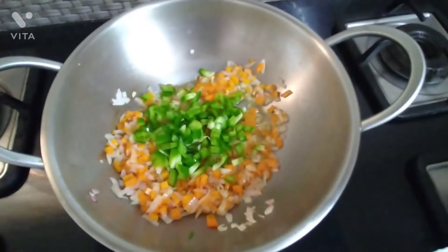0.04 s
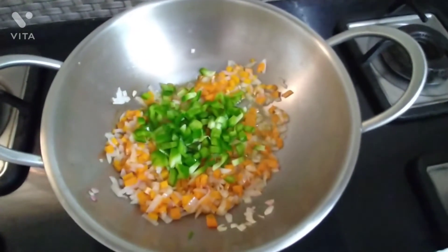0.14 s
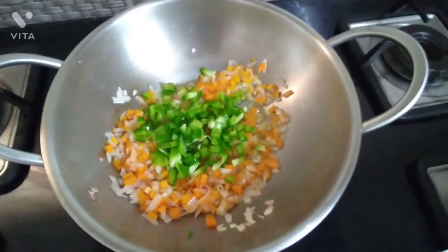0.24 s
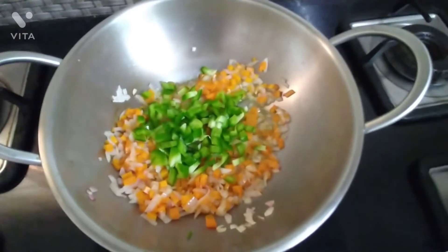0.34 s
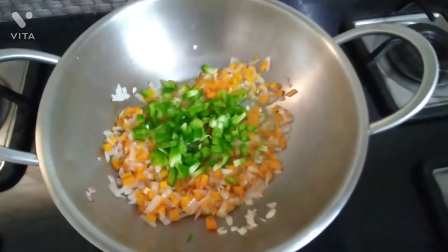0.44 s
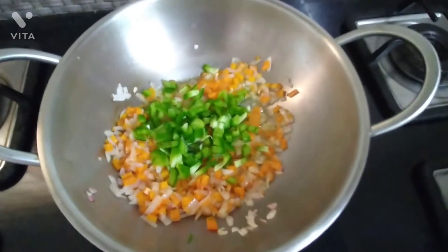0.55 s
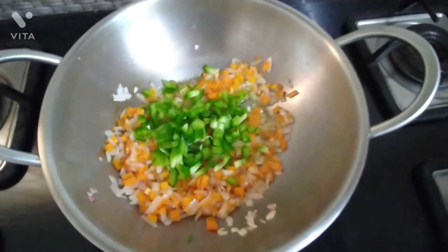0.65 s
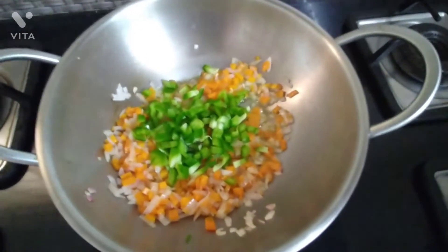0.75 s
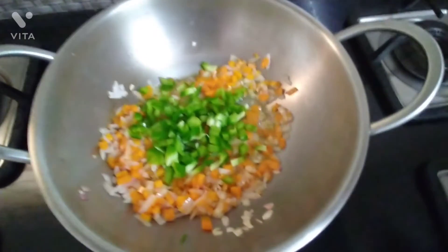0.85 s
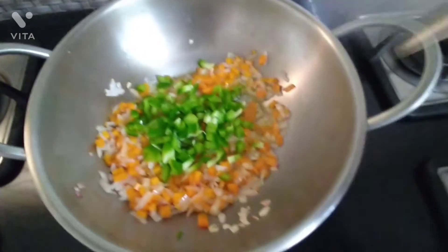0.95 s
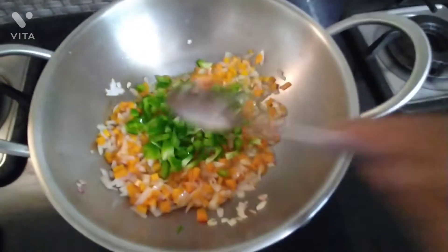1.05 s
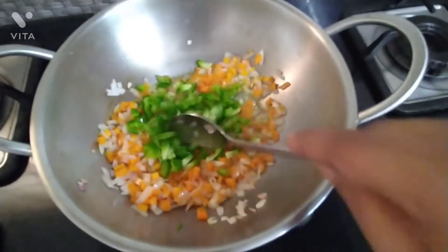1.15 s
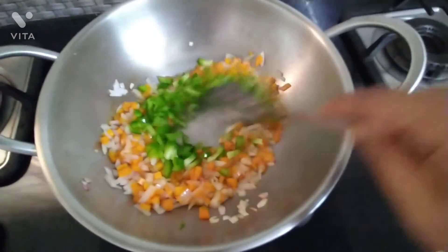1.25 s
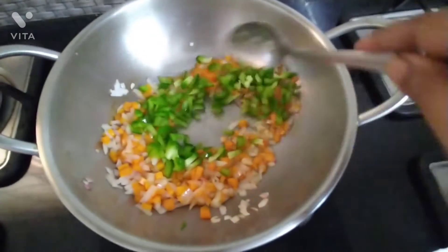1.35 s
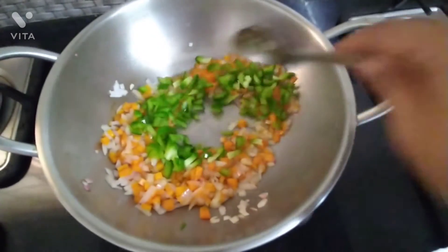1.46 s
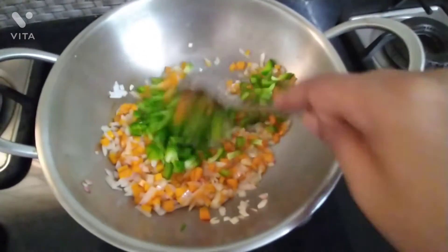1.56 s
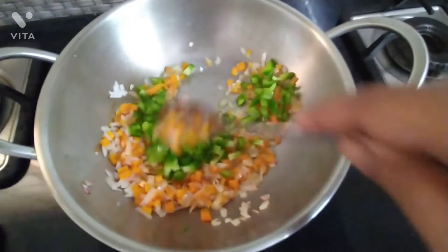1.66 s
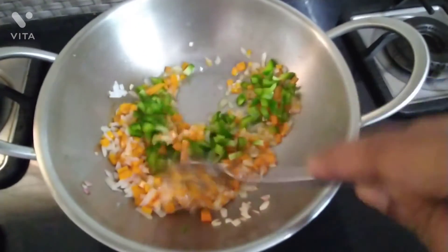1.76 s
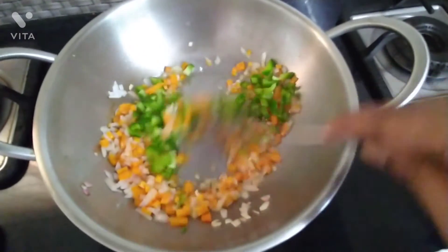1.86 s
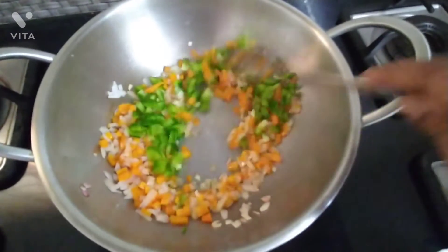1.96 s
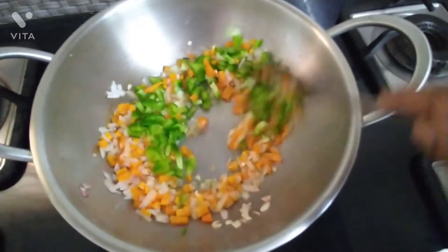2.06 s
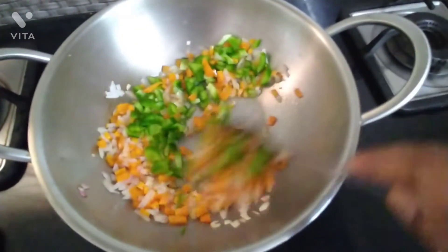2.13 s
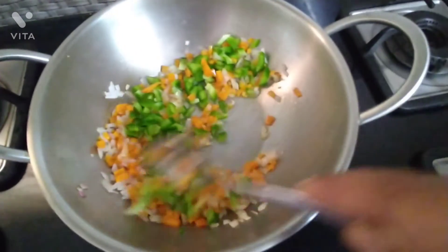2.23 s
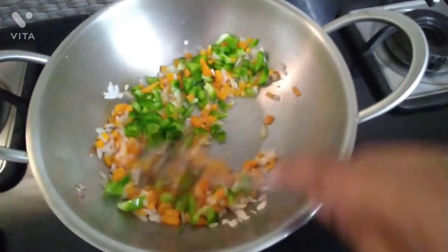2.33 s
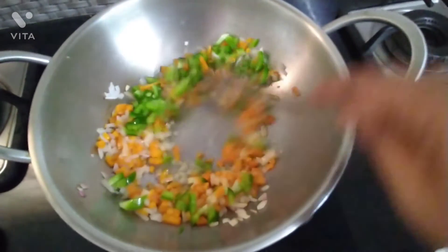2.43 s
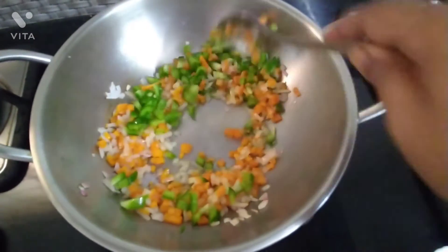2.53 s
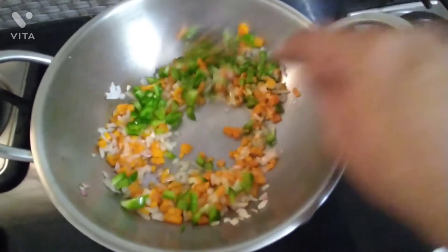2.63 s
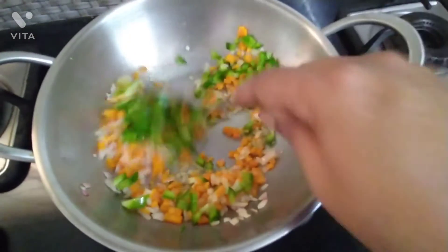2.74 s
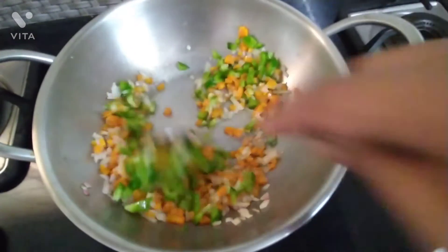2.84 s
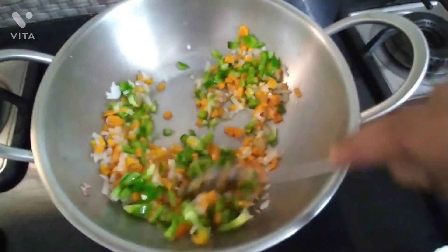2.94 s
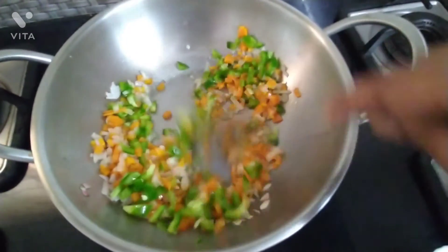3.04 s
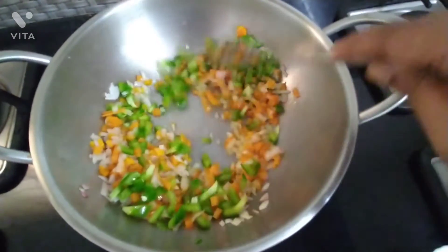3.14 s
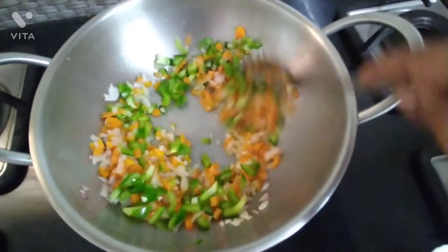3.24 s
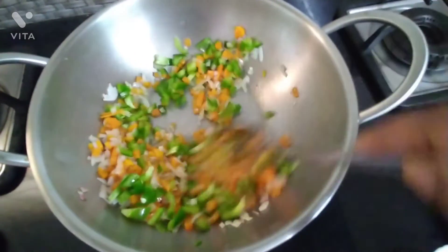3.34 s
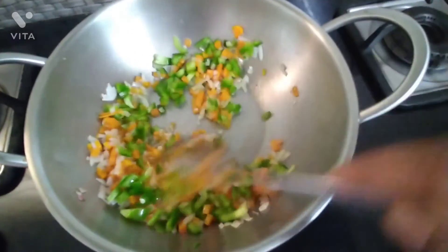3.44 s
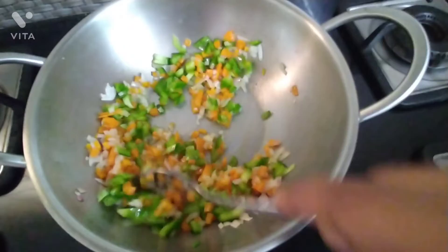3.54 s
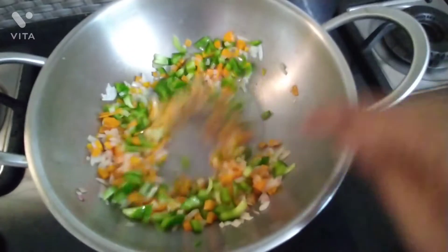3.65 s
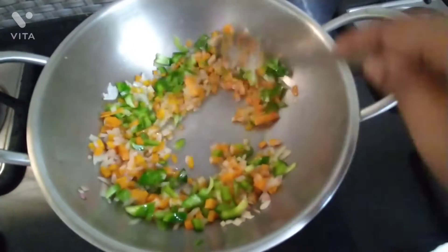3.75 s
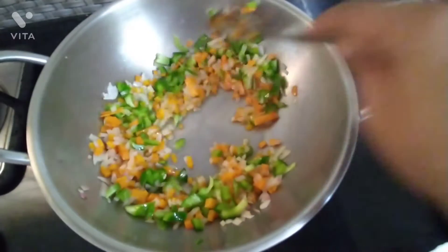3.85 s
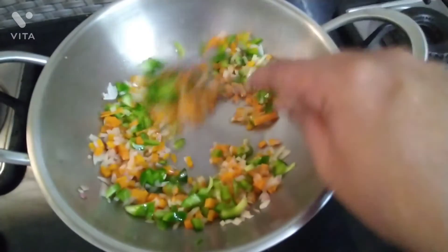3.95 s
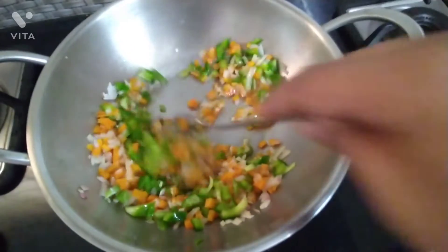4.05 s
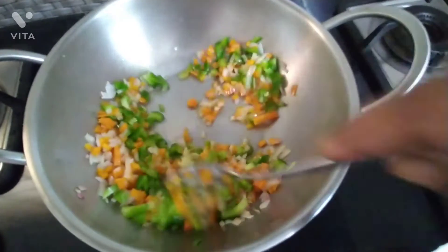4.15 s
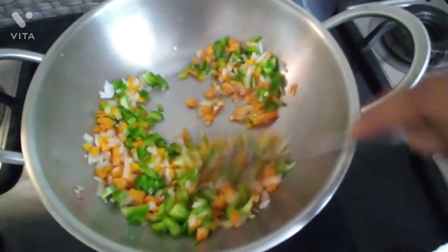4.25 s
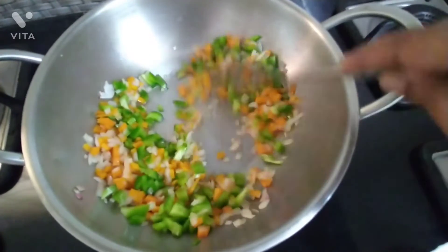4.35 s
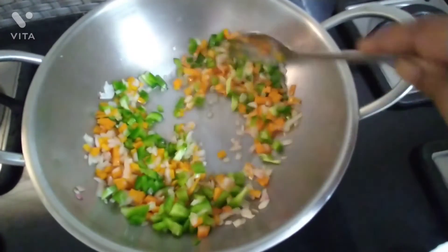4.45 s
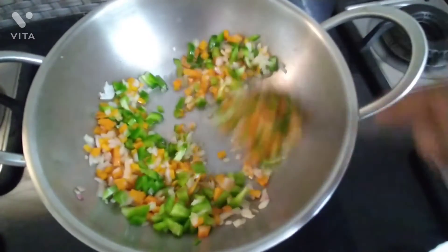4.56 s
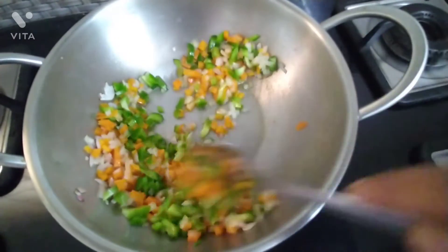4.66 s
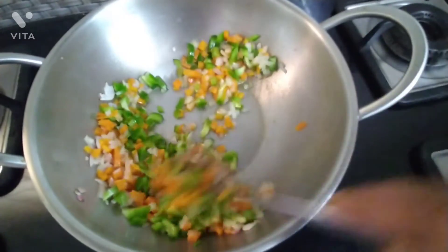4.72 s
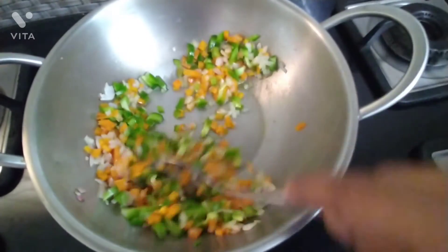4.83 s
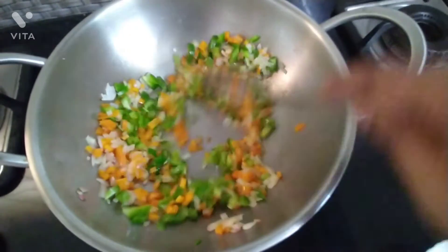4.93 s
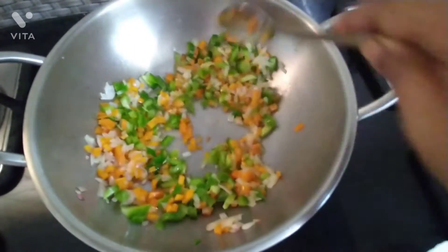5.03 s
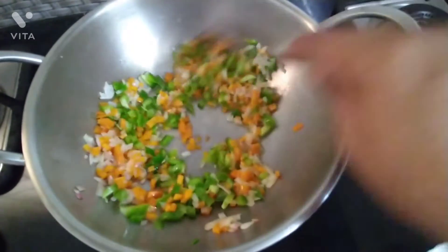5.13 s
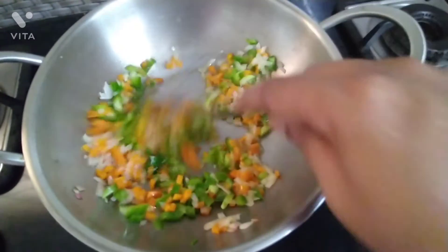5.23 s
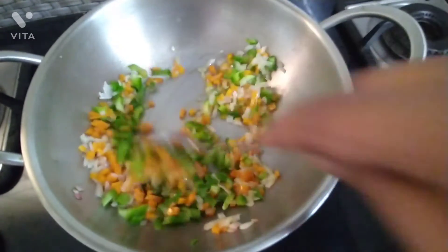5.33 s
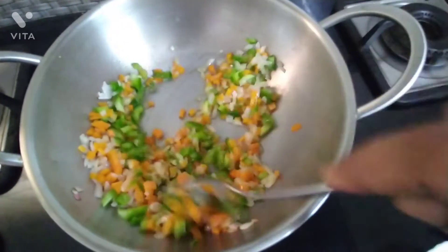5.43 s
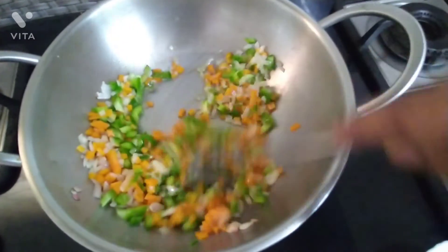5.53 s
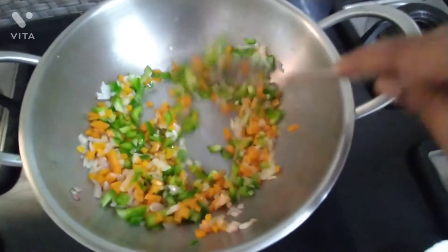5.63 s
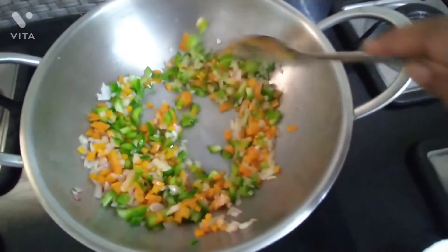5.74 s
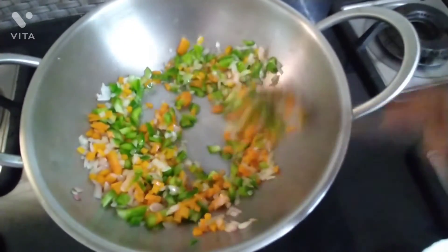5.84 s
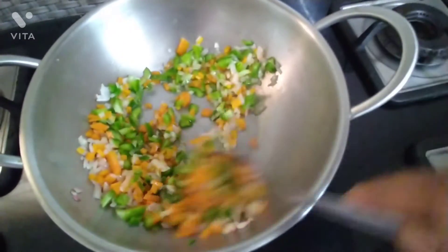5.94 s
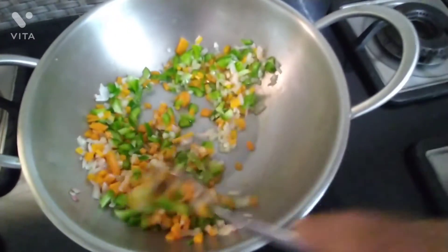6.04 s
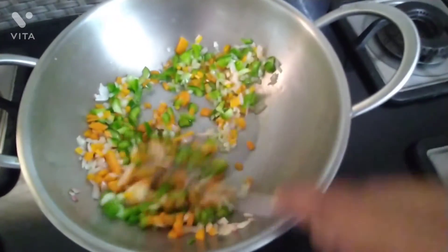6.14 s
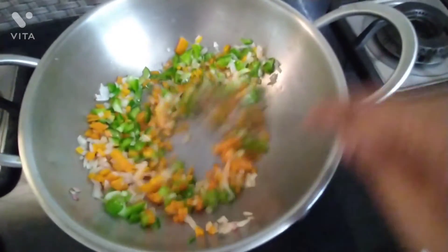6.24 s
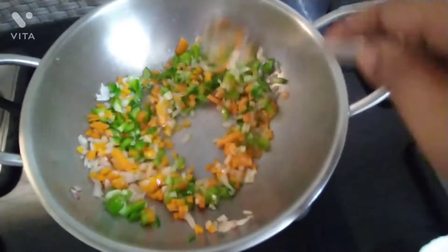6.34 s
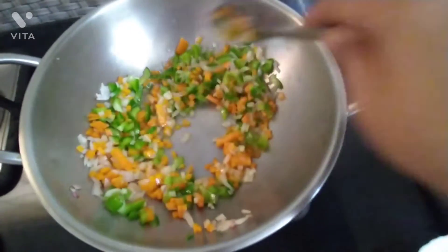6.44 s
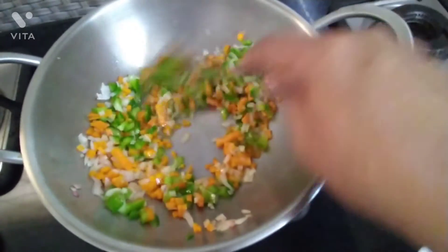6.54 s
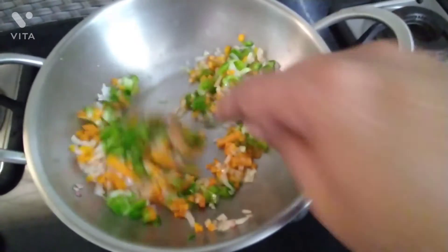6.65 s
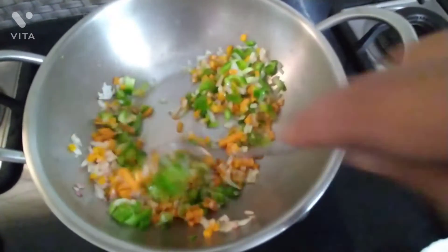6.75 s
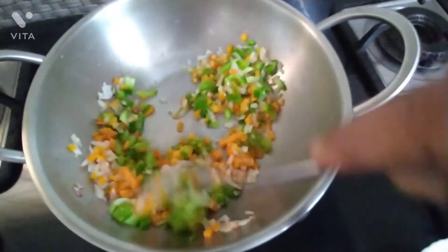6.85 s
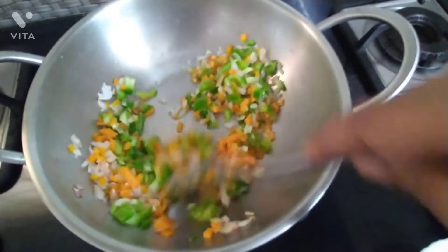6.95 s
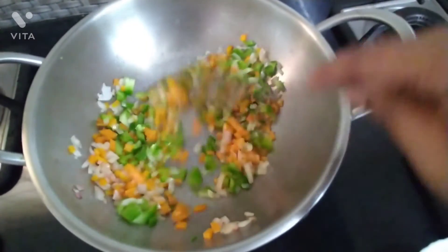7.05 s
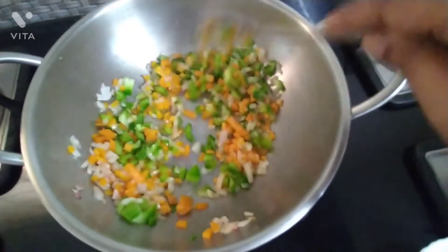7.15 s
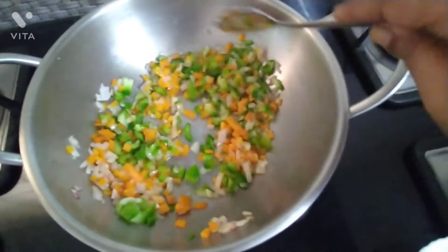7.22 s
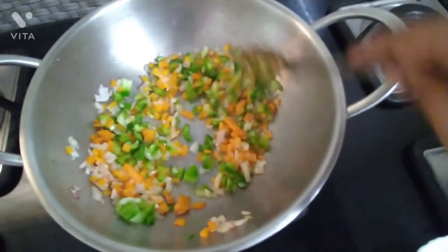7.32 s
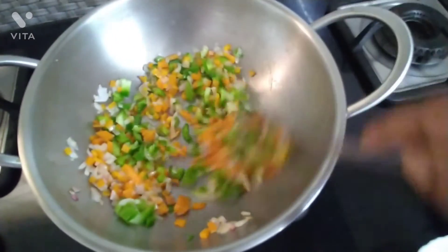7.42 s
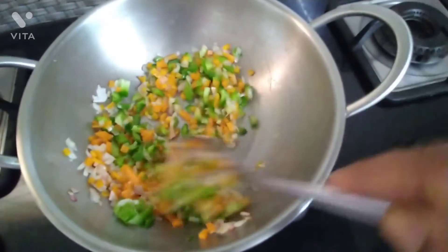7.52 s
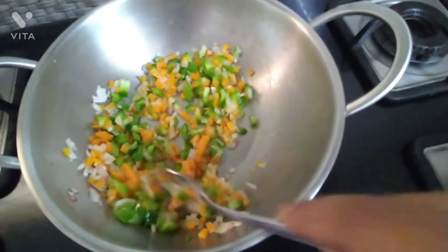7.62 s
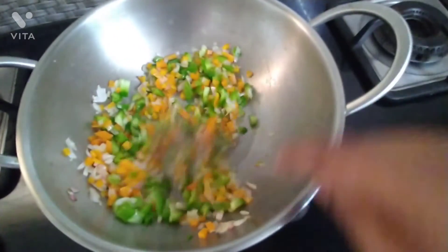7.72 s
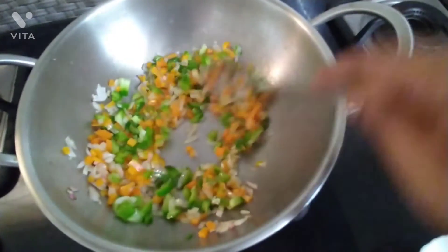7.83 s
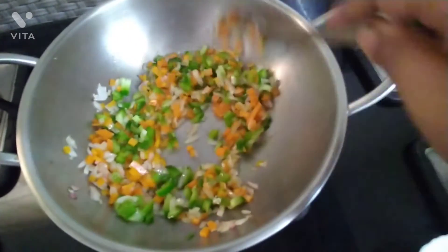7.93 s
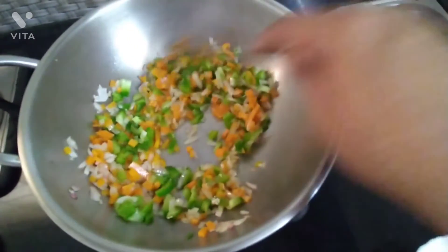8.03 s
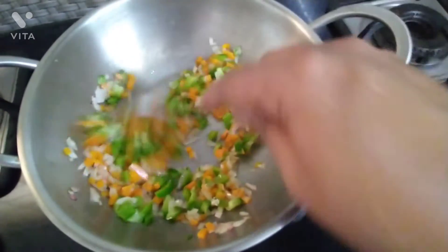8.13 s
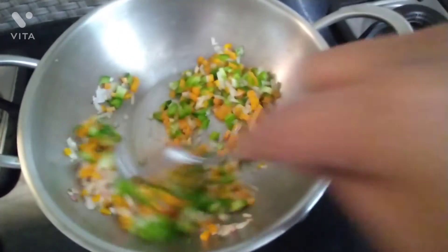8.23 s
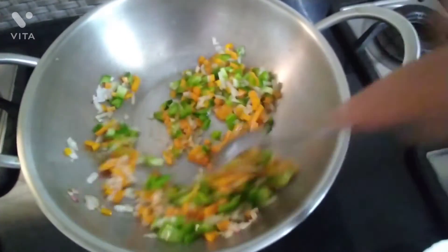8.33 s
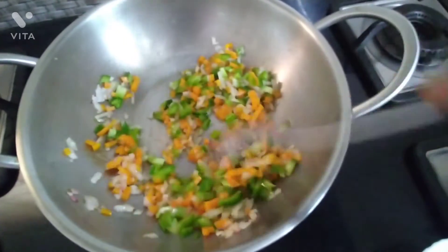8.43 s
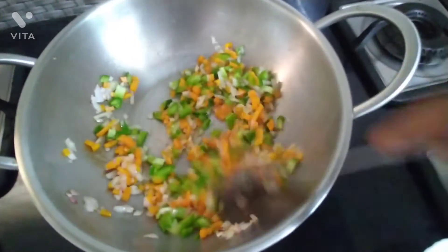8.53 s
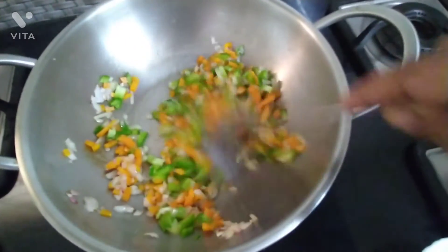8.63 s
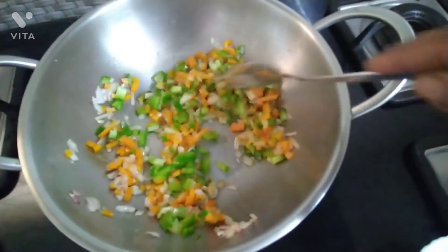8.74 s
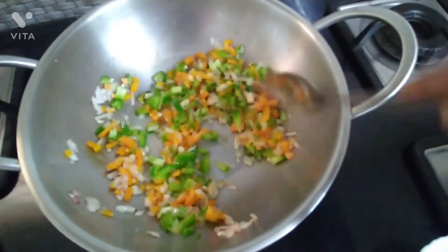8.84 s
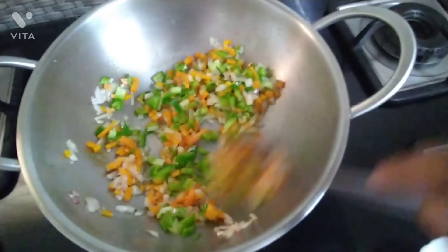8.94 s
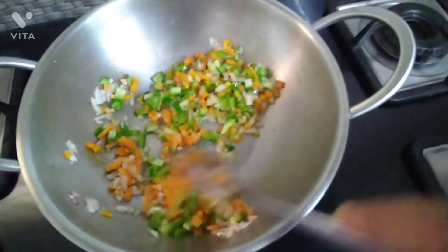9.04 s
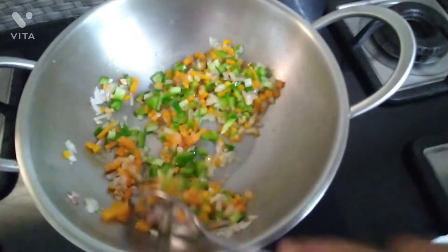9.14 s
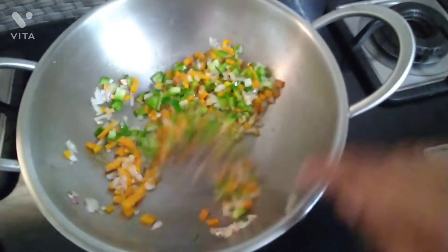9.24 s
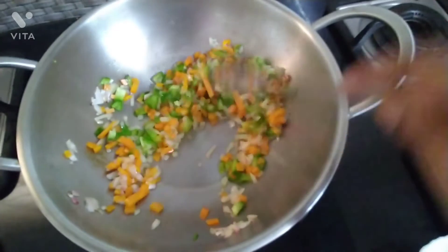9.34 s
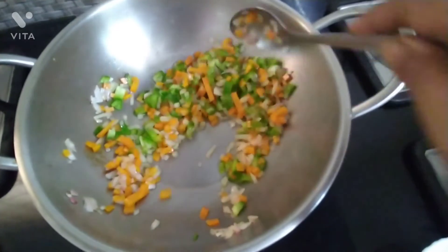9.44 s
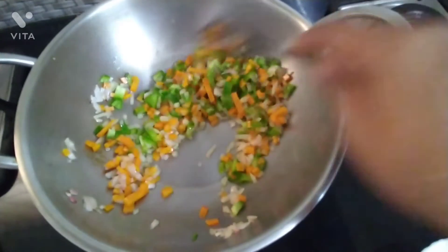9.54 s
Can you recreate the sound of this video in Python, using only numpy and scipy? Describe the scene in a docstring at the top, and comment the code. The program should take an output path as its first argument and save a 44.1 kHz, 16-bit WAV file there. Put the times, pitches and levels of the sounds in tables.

```python
"""At a stove, chopped vegetables fry in a thin steel pan close to two microphone ports.
Steam bubbles burst in the oil: many small clicks and hiss, filtered in bands, make a dense bright sizzle.
A steel spoon scrapes round (jerky clicks) and knocks the wall (fading tones with bursts of noise).
The pan rings and rocks on its grate over the burner's roar (deep filtered noise); hot oil spits and pops."""
import sys
import numpy as np
from scipy import signal
from scipy.fft import rfft, irfft, next_fast_len
from scipy.io import wavfile
from scipy.ndimage import uniform_filter1d

SR = 44100
rng = np.random.default_rng(int(sys.argv[2]) if len(sys.argv) > 2 else 0)


def generate_wav(signal):
    """Clip the signal to [-1, 1] and save it as 16-bit WAV at the path in sys.argv[1]."""
    frames = np.transpose(np.atleast_2d(signal))
    scaled = np.clip(frames, -1, 1) * 32767
    pcm = np.round(scaled).astype(np.int16)
    wavfile.write(sys.argv[1], SR, pcm)


def elevation(decibels):
    """Turn decibel levels (scalar or array-like) into linear amplitude ratios."""
    levels = np.asarray(decibels, float)
    return 10 ** (levels / 20)


N = 422478  # length in samples

# the ringing tones (modes) of the steel pan:
# f/Hz, relative level/dB, time to fade by 60 dB when undamped/s, left minus right/dB
STEEL = [(178, -15.5, 0.64, 0), (362, -21.5, 0.34, 3), (440, -17, 1.0, -5.5), (657, -12.5, 0.21, -4),
         (793, -16, 0.26, 5), (914, -12.5, 0.21, 6.5), (1126, -17, 0.35, 4), (1240, -10, 0.47, 6.5),
         (1370, -28, 0.21, 19), (1575, -11.5, 0.33, 4), (1690, -6, 0.16, 3.5), (1803, -6, 0.033, -1),
         (1937, -9.5, 0.23, 4.5), (2155, -3.5, 0.74, -3.5), (2260, -5, 0.23, 6), (2490, -11, 0.29, 16),
         (2565, -11, 0.17, -9), (2733, -9.5, 0.12, -11), (2997, -14, 0.16, -29.5), (3172, -10, 0.051, 19),
         (3290, -17, 0.11, 2), (3500, -15, .2, -2), (3830, -3.5, 0.79, -4), (4240, -30, 0.3, -1),
         (5080, -5, 0.31, 4), (5340, -1, 0.22, -6), (5540, -16, 0.19, 9), (6020, -5.5, 0.49, -16),
         (6700, -22, .2, 5), (6700, -13, 0.18, 5), (7010, -7.5, 0.19, -22), (7650, 2, 0.51, -15),
         (9840, -1.5, 0.22, 28), (10700, -27, 0.15, 8), (13630, -14, 0.12, 12)]
# how hard the oil fries:
# t/s, relative sizzle level/dB, brightness above 10 kHz/(dB per octave), left minus right before the shade/dB
HEAT = [(0, -23.5, -9, -2), (1.25, -21.5, -14, 0), (1.9, -21.5, -7, -1.5), (2.45, -20.5, -7, -1),
        (3.1, -20.5, 1, -0.5), (3.5, -18, 3, -2.5), (3.85, -16.5, 3.5, -1), (4.1, -16, 3, -5.5),
        (4.5, -19.5, 3, -0.5), (4.9, -22, 7, -1.5), (5.55, -22.5, 0.5, -1.5), (6.0, -22, 7, 1),
        (6.6, -19.5, -3, -2), (7.0, -22.5, 4, -2), (7.4, -18.5, -1, -2), (7.75, -20.5, -3, 1),
        (8.35, -18, -5, -1), (8.95, -18.5, -5.5, -2), (9.58, -16, -20, -3)]
BANDS_HZ = 400 * 2 ** np.arange(0, 5.6, .5)  # band centres, half an octave apart
RUSTLE_DB = -34  # resting scrape level once the food is spread out


def curve(table):
    """Columns of a time table, one value a sample."""
    s, *columns = np.transpose(table)
    return [np.interp(np.arange(N) / SR, s, c) for c in columns]


def unit(x):
    """Scale to rms 1."""
    return x / np.sqrt(np.mean(x ** 2))


def colour(x, points, sign=1):
    """Filter by (f/Hz, level/dB) points joined on a log-frequency axis."""
    n = next_fast_len(N)
    hz, db = np.transpose(points)
    bin_hz = np.arange(1, n // 2 + 2) * SR / n
    gain = elevation(sign * np.interp(np.log(bin_hz), np.log(hz), db))
    return irfft(rfft(x, n) * gain, n)[..., :N]


def band(x, hz):
    """Keep the sound within half an octave either side of hz; neighbouring bands add up to even power."""
    n = next_fast_len(N)
    bin_hz = np.arange(1, n // 2 + 2) * SR / n
    away = np.clip(2 * np.log2(bin_hz / hz), -1, 1)
    return irfft(rfft(x, n) * np.cos(np.pi / 2 * away), n)[..., :N]


def walk(rate):
    """Random levels held 1 / rate s and smoothed twice; spread near 1."""
    k = int(SR / rate)
    held = np.repeat(rng.standard_normal(N // k + 1), k)
    return 1.87 * uniform_filter1d(uniform_filter1d(held, k), k)[:N]


def clicks(per_s, spread_db, apart_s):
    """Scattered clicks of uneven size; each lies elsewhere in the pan, so each reaches the ports at its own lag."""
    at, size, place, keep = rng.random((4, 60000))
    size = elevation(np.minimum(-spread_db * np.log(1 - size), 3.3 * spread_db))
    size = size * (keep < per_s * N / SR / len(at))
    size = size * rng.choice([-1, 1], len(at))
    lags = np.outer([1, -1], apart_s * (place - .5))
    where = np.clip(at * N + lags * SR, 0, N - 1).astype(int)
    return unit(np.array([np.bincount(w, size, N) for w in where]))


def sides(db):
    """Left and right gain for a level difference."""
    return elevation(np.array([db / 2, -db / 2]))


def swells(s, rise_s, fall_s):
    """One swell of height 1 for each time, rising and sinking exponentially, at every 32nd sample."""
    late = np.arange(0, N, 32) / SR - np.reshape(s, (-1, 1))
    rising = late / np.reshape(rise_s, (-1, 1))
    falling = -late / np.reshape(fall_s, (-1, 1))
    return np.exp(np.where(late < 0, rising, falling))


def fine(coarse):
    """A slow control, given at every 32nd sample, filled in for every sample."""
    return np.interp(np.arange(N), np.arange(0, N, 32), coarse)


def surges():
    """Food thrown on bare hot steel makes hiss and grit leap in level and sink back: the added dB."""
    # t/s, rise (dip if negative)/dB, fading time constant/s
    leaps = [(1.352, 2, 0.047), (1.651, 3, 0.051), (2.55, 1, 0.032), (5.003, -3.5, 0.034),
             (6.339, 1.5, .04), (7.381, 9, 0.012), (8.681, 11, 0.0099), (8.999, 3, 0.038),
             (9.294, 11.5, 0.012)]
    t = np.arange(N) / SR
    return sum(db * (t >= s) * np.exp(-np.maximum(t - s, 0) / fading) for s, db, fading in leaps)


def stirring():
    """Scrape level and added sizzle in dB: each stroke presses in, then lets go."""
    # spoon strokes: t of firmest contact/s, scrape level/dB, rise of the sizzle/dB, length/s
    strokes = [(0.088, -35, 2, 0.051), (1.383, -33, 8, 0.069), (1.67, -31, 8, 0.15), (1.96, -33, 3, 0.073),
               (2.068, -45, 6.5, 0.14), (2.25, -24.5, 3.5, 0.12), (2.573, -41, 8.5, 0.11),
               (2.775, -32, 4, 0.12), (2.849, -6, -10, 0.027), (2.937, -25.5, 2, 0.12),
               (3.268, -36, 5, 0.22), (3.486, -23, 4.5, 0.096), (3.82, -19, 3.5, 0.12),
               (4.105, -17, -9, 0.082), (4.274, -57, -0.5, .07), (4.435, -31, 3, 0.088),
               (4.697, -28, 6, 0.1), (5.033, -24, 8.5, 0.2), (5.352, -18.5, 8, 0.12),
               (5.779, -28.5, 6.5, 0.066), (6.03, -32, 1, .08), (6.35, -31, 4, 0.13),
               (6.714, -26, 1.5, 0.14), (7.177, -29, 6.5, 0.12), (7.41, -29, -8, 0.057),
               (7.517, -25, 1.5, 0.23), (7.905, -31, 6, 0.13), (8.026, -36, -4, 0.044),
               (8.223, -24.5, 4.5, 0.15), (8.71, -41, -2, 0.11), (8.78, -22, 3, 0.073),
               (8.857, -32, 6, 0.058), (9.044, -26, 1, 0.065), (9.364, -16, -6, 0.075),
               (9.466, -30, -3, 0.17)]
    rise_share, fall_share, sizzle_spread = 0.48, 0.65, 0.85  # of a stroke's length
    # food ticks on the steel alone, then rustles under the spoon;
    # the heap cushions the spoon until it is spread out
    spoon_in_s, spread_s, settling_db = 1.43, 1.0, -62
    s, scrape_db, rise_db, length = np.transpose(strokes)
    rest_db = np.interp(np.arange(N) / SR, [spoon_in_s, spoon_in_s + spread_s], [settling_db, RUSTLE_DB])
    press = fine(elevation(scrape_db) @ swells(s, rise_share * length, fall_share * length))
    heard = sizzle_spread * length
    sizzle_rise_db = fine(rise_db @ swells(s, rise_share * heard, fall_share * heard))
    return 20 * np.log10(elevation(rest_db) + press), sizzle_rise_db


def rocking():
    """Burner roar, and thumps and drumming of the rocking pan, as deep noise nearly alike at both ports."""
    # noise colour: f/Hz, level/dB
    roar = [(15, -46.5), (25, -60), (54, -8), (91, 10.5), (129, -0.5), (181, 1), (237, -15), (409, 5.5),
            (520, -33), (680, -59), (1140, -120)]
    # the pan rocks on the grate: t/s, thump level/dB, drumming of the pan bottom/dB
    rocks = [(.09, -68, -34), (.75, -62, -60), (1.47, -62, -56), (1.67, -52, -46), (1.81, -49, -48),
             (2.0, -46, -48), (2.22, -37.5, -41), (2.47, -41, -44), (2.61, -65, -52), (2.91, -44, -52),
             (3.11, -62, -45), (3.24, -53, -54), (3.42, -37, -47), (3.6, -42, -47), (3.77, -51, -42),
             (4.01, -50, -49), (4.16, -48.5, -60), (4.43, -46, -47), (4.68, -37.5, -56), (4.82, -42, -50),
             (4.99, -42.5, -45), (5.27, -58, -42), (5.42, -43.5, -53), (5.62, -46, -68), (5.95, -45, -59),
             (6.14, -46, -51), (6.33, -52, -54), (6.61, -66, -47), (6.8, -41, -56), (7.06, -42, -65),
             (7.26, -51, -51), (7.44, -38, -49), (7.66, -45, -51), (7.8, -47, -47), (7.96, -68, -54),
             (8.3, -44.5, -47), (8.51, -41, -49), (8.7, -45, -45), (9.02, -39, -42), (9.46, -40, -39),
             (9.56, -41, -55)]
    rise_s, fall_s, burner_db = 0.035, 0.055, (-59, -55)  # burner roar under thump and drumming
    mid, side = rng.standard_normal((2, N))
    difference = colour(side, [(40, -14), (90, -24), (200, -15), (400, -29)])
    both = colour(mid + difference * np.array([[1], [-1]]), roar)
    thump, low = (signal.sosfiltfilt(signal.butter(3, hz, fs=SR, output="sos"), both) for hz in (130, 250))
    s, *peaks_db = np.transpose(rocks)
    rises = swells(s, rise_s, fall_s)
    thump_db, drum_db = (20 * np.log10(elevation(rest_db) + fine(elevation(db) @ rises))
                         for rest_db, db in zip(burner_db, peaks_db))
    # a fainter upper part follows the drumming
    upper_db = -66.5 + 1.3 * (drum_db + 44.5) + 1.2 * walk(5.7)
    return unit(thump) * elevation(thump_db) + unit(low - thump) * elevation(drum_db) + unit(both - low) * elevation(upper_db)


def pops():
    """A large bubble pops: a bright, dry click about a millisecond long."""
    # t/s, level/dB
    big_bubbles = [(0.131, -16), (0.705, -13), (3.519, -18), (3.569, -16), (9.252, -10)]
    t = np.arange(int(.004 * SR)) / SR
    out = np.zeros((2, N + len(t)))
    click = np.cos(2 * np.pi * 7000 * t) * np.exp(-((t - .001) / 0.00026) ** 2)
    for s, db in big_bubbles:
        i = int((s - .001) * SR)
        out[:, i:i + len(t)] += click * elevation(db) * sides(6.1)[:, None]
    return out[:, :N]


def spits():
    """A drop of water bursts in the oil: some milliseconds of noise round its pitch."""
    # loud spits of oil: t/s, level before filtering/dB, f/Hz
    loud = [(3.015, -19, 8460), (3.4484, -4, 9840), (3.5624, -8, 7400), (4.5284, -4.5, 9920),
            (4.7894, -9, 10600), (5.1264, -7, 10000), (5.8804, -7, 9800), (5.9204, -8, 8940),
            (7.1164, -15, 10400), (7.496, -9, 8930), (7.659, -7, 9800), (7.8388, -2.5, 8150),
            (8.8404, -14, 10600)]
    t = np.arange(int(.03 * SR)) / SR
    out = np.zeros((2, N + len(t)))
    # small spits at random times; their level follows the heat
    when, size, pitch = rng.random((220, 3)).T
    small_db = curve(HEAT)[0][(when * N).astype(int)] + 6.5 + 9 * (size - .5)
    small_hz = 9800 * 2 ** (.7 * (pitch - .5))
    small = zip(when * N / SR, small_db, small_hz)
    for s, db, hz in [*loud, *small]:
        around = signal.butter(1, [hz / 1.085, hz * 1.067], "band", fs=SR)
        burst = signal.lfilter(*around, rng.standard_normal((2, len(t))))
        i = int(s * SR)
        out[:, i:i + len(t)] += burst * np.exp(-t / 0.0099) * elevation(db) * sides(12.5)[:, None]
    return out[:, :N]


def sings():
    """The dragged spoon holds one mode singing: a broken tone, rougher the faster it flutters."""
    # t/s, length/s, f/Hz, relative level/dB, flutters/(1/s)
    drags = [(1.339, 0.092, 2520, -28.5, 600), (2.253, 0.052, 5340, -30, 120),
             (2.75, 0.23, 2155, -34.5, 69), (3.77, 0.092, 2155, -40, 71), (4.025, 0.079, 2200, -32, 160),
             (4.132, 0.05, 2470, -31.5, 180), (4.425, 0.045, 2155, -39, 80),
             (5.232, 0.046, 2733, -30.5, 90), (5.285, 0.17, 2155, -33, 33)]
    t, out = np.arange(N) / SR, 0
    for s, length, hz, db, flutters in drags:
        swell = np.sin(np.pi * np.clip((t - s) / length, 0, 1)) ** 0.26
        tone = np.sin(2 * np.pi * hz * t) * (0.5 + walk(flutters)) * elevation(db)
        out = out + swell * tone * sides(0.84)[:, None]
    return out


def scrape():
    """The spoon's edge catches in dense jerks; part is heard as grit, part rings the damped modes."""
    # colour of the grit: f/Hz, level/dB
    grit_colour = [(200, -90), (520, -102.5), (650, -6.5), (1000, -8), (1500, -17), (2500, -7.5),
                   (4500, -2.5), (7500, 5.5), (11000, -4.5), (16000, -2.5)]
    level_db = stirring()[0]
    ring_db = -7.5 - 0.77 * (level_db - RUSTLE_DB)  # firmer contact damps the steel
    jerks = clicks(2500, 2.27, .0004) * elevation(2.0 * walk(45) + level_db + surges())
    # the contact wanders, so each band of the grit comes and goes
    wandering = sum(band(jerks, hz) * elevation(3.4 * walk(26)) for hz in BANDS_HZ)
    grit = colour(wandering, grit_colour) * elevation(1.0)
    ring = 0
    for hz, db, t60, pan_db in STEEL:
        # food and spoon damp the wall; the moving contact wakes each mode by its own random level
        pole = np.exp(-np.log(1000) / (min(.5 * t60, .09) * SR))
        turn = 2 * np.pi * hz / SR
        waking_db = 3.5 * walk(20)
        push = jerks * elevation(ring_db + waking_db)
        strength = np.sin(turn) * np.sqrt(1 - pole)
        tone = signal.lfilter([strength], [1, -2 * pole * np.cos(turn), pole ** 2], push)
        mode_db = db + 0.15 * np.log2(hz / 1000) - 10.0 * (hz < 600)
        ring = ring + elevation(mode_db) * tone * sides(pan_db)[:, None]
    return grit, ring * elevation(-2.5)


def knocks():
    """Each blow starts all modes, most those near its favoured pitches, with short bursts of noise."""
    # t/s, relative clink level/dB, f the clink favours/Hz, relative deep ring level/dB, f the body favours/Hz
    blows = [(0.0866, -21, 7300, -33.5, 1270), (1.353, -1, 5970, -36, 950),
             (1.654, -1.5, 6800, -28.5, 2500), (1.672, -3.5, 5340, -47, 2500),
             (2.203, -18, 8070, -31.5, 1700), (2.7633, -7, 4900, -30, 675), (2.85, -2.5, 3830, -29.5, 2155),
             (2.858, 0, 5080, -40, 2155), (3.484, 1, 8000, -33.5, 762), (3.7643, -1, 6120, -28.5, 764),
             (4.102, 1, 5340, -29, 1130), (4.109, -1.5, 3830, -38, 2480), (4.122, -3, 9600, -47, 2155),
             (4.142, -8, 8300, -38, 1670), (4.4248, -20, 5310, -37, 649), (4.6617, -27, 7900, -27.5, 655),
             (4.6989, 0, 4970, -30, 623), (5.003, 1, 5800, -38, 912), (5.236, -1, 7600, -27, 656),
             (5.3386, 1.5, 5340, -30.5, 1300), (5.9526, -29, 8380, -29.5, 770),
             (6.339, 1, 6020, -32.5, 910), (6.7176, -7, 5470, -32, 920), (7.381, -6.5, 8600, -20, 1240),
             (7.5288, -7, 5300, -28.5, 775), (8.228, -6, 9900, -34.5, 1240), (8.6815, 2, 3400, -18.5, 2600),
             (8.709, -10, 3300, -30, 2155), (8.769, -3, 8100, -39, 444), (8.9984, -2, 6800, -22.5, 1240),
             (9.007, -14, 2155, -22, 660), (9.2936, 3, 7250, -18, 2650), (9.387, 2.5, 5700, -26.5, 440)]
    hz, mode_db, t60, pan_db = np.transpose(STEEL)
    t = np.arange(int(.45 * SR)) / SR
    deep, body = hz < 1450, hz < 3000
    out = np.zeros((2, N + len(t)))
    for s, db, clink_hz, deep_db, body_hz in blows:
        middle_db = 1 + db + 0.88 * deep_db  # middle modes follow both clink and deep ring
        scatter, phase = rng.standard_normal(len(hz)), rng.random(len(hz))
        near = np.exp(-(np.log2(hz / np.where(body, body_hz, clink_hz)) / 0.16) ** 2)
        drive_db = np.where(deep, deep_db - 2.0, np.where(body, middle_db - 10.0, db - 28.0))
        # the modes are struck a little unevenly
        gain = elevation(drive_db + mode_db + near * np.where(body, 8.0, 7.0) + 1.3 * scatter)

        # deep blows land on the bare wall and ring free, light ones land among the food
        free = np.clip((deep_db + 35.5) / 11, .3, 1)
        # treble modes shift with the place struck, and food soon stills them
        struck_hz = hz * (1 + 0.021 * ~body * (2 * phase - 1))
        fade_s = np.minimum(t60 * free, np.where(body, 2, 0.14))
        rings = np.exp(np.outer(2j * np.pi * struck_hz - np.log(1000) / fade_s, t))
        # each mode is a close pair that beats
        beat_hz = 0.0087 * hz * (phase - .3)
        rings = rings * (1 + 0.35 * np.exp(2j * np.pi * np.outer(beat_hz, t)))

        # food and spoon chatter on the ringing wall: 77 random steps a second, joined by lines
        steps = rng.standard_normal((len(hz), 64)) + 1j * rng.standard_normal((len(hz), 64))
        k, part = np.divmod(t * 77, 1)
        k = k.astype(int)
        chatter = steps[:, k] * (1 - part) + steps[:, k + 1] * part
        rings = rings * (1 + 0.71 * chatter * np.minimum(hz / 3500, 1)[:, None])
        rings = rings * (1 - np.exp(-t / 0.002))  # soft start
        # each mode above 300 Hz reaches the right port at its own phase
        port_phase = np.outer([0, 1j], 0.35 * scatter * (hz > 300))
        start = np.exp(2j * np.pi * phase + port_phase) * sides(pan_db)

        noise = rng.standard_normal((3, 2, len(t)))
        crack = signal.lfilter(*signal.butter(2, [clink_hz / 1.09, clink_hz * 1.09], "band", fs=SR), noise[0])
        crack = crack * (np.exp(-t / 0.0051) + 0.14 * np.exp(-t / 0.071))
        crack = crack * elevation(db + 2.0) * sides(2.6)[:, None]
        thud = signal.lfilter(*signal.butter(1, [250, 1500], "band", fs=SR), noise[1])
        thud = thud * np.exp(-t / 0.01) * elevation(deep_db + 3.5)
        clank = signal.lfilter(*signal.butter(1, [1500, 7000], "band", fs=SR), noise[2])
        clank = clank * (np.exp(-t / 0.0027) + 0.22 * np.exp(-t / 0.15))
        clank = clank * elevation(middle_db + 1.0) * sides(3.3)[:, None]
        i = int(s * SR)
        out[:, i:i + len(t)] += ((start * gain) @ rings).imag + crack + thud + clank
    return out[:, :N]


def sheen(fry):
    """The sizzle drives each high mode of the wall, which hums, waking and fading on its own."""
    # f/Hz, width/Hz, level against the sizzle before the bareness is added/dB
    high_modes = [(5340, 120, -29), (6550, 52, -28.5), (7160, 71, -26), (8080, 83, -23), (8850, 200, -19),
                  (9600, 190, -16.5), (9900, 120, -22.5), (10600, 57, -17.5), (11840, 86, -31),
                  (12470, 120, -31), (13600, 87, -33), (14750, 110, -38), (15500, 85, -41),
                  (16000, 90, -28)]
    # the barer the steel, the more it hums: t/s, level/dB
    bareness = [(0, -5), (1.3, -12.5), (2.6, -4), (3.4, 0.5), (4.1, 3), (4.8, 0), (5.5, 7.5), (6.5, 2),
                (7.2, 5), (8.0, 0.5), (9.0, -5), (9.58, -12)]
    out = 0
    for hz, width, db in high_modes:
        pole, turn = np.exp(-np.pi * width / SR), 2 * np.pi * hz / SR
        tone = signal.lfilter([1], [1, -2 * pole * np.cos(turn), pole ** 2], fry)
        out = out + unit(tone) * elevation(db + 3.15 * walk(14))
    return out * elevation(curve(bareness)[0])


def sizzle():
    """Bubbles burst as clicks in bands over a fine hiss; sparser crackles span all the bands."""
    # colour of the sizzle: f/Hz, level/dB
    fizz_colour = [(150, -55.5), (250, -40), (341, -56), (491, -61), (564, -53), (695, -31), (1490, -25),
                   (2070, -21.5), (3300, -15), (4000, -12), (4510, -8.5), (6060, -9), (6840, -6),
                   (10500, 3), (15700, -6.5)]
    dulling = 0.45  # a swell is duller: dB per octave above 4 kHz for each dB of rise
    level_db, bright_db, pan_db = curve(HEAT)
    rise_db = stirring()[1]
    level_db = level_db + rise_db + 0.17 * walk(55)
    fry = clicks(60, 2.6, 0.00025) * elevation(-21)
    fry = fry + clicks(400, 2.7, .0002) * elevation(-15 + 0.92 * rise_db)  # stirred food crackles
    shared = rng.standard_normal(N)  # hiss common to both ports
    for hz in BANDS_HZ:
        bursts = clicks(min(.4 * hz, 6000), 3.1, .0002) * elevation(-2.5)
        hiss = (rng.standard_normal((2, N)) + 0.57 * shared) * elevation(-7.0)
        tilt_db = bright_db * max(np.log2(hz / 10000), 0)
        dull_db = dulling * rise_db * max(np.log2(hz / 4000), 0)
        fry = fry + band(bursts + hiss, hz) * elevation(1.19 * walk(40) + tilt_db - dull_db)
    fry = unit(colour(fry, fizz_colour))
    return (fry + sheen(fry)) * elevation(level_db + 5.0 + surges()) * sides(pan_db + 1.05 * walk(11))


def scene():
    """Hiss and grit are shaded at the far port, rings keep their own balance; all but the rocking is phase-turned."""
    # the right port faces away from the pan: f/Hz, loss before a factor of 1.005/dB
    shade = [(200, 12.5), (380, 0), (700, 8.5), (1300, 13.5), (2400, 5.5), (4400, 6), (7500, 6),
             (10500, 19), (13000, 12), (16000, 8)]
    # by how much the left port leads: f/Hz, phase/rad
    left_lead = [(0, 0), (430, 1), (690, 1.44), (1890, 2), (2150, 4), (2760, 4.5), (3100, 0.5), (3790, 6),
                 (4130, 0.5), (5250, -1.8), (6200, 7), (9820, -1.5), (11600, 7.5), (15500, 13)]
    grit, ring = scrape()
    left, right = sizzle() + grit
    shaded = np.array([left, colour(right, shade, sign=-1.005)])
    left, right = shaded + ring + knocks() + sings() + spits() + pops()
    hz, lead = np.transpose(left_lead)
    delay = np.interp(np.arange(N // 2 + 1) * SR / N, hz, lead)
    right = irfft(rfft(right) * np.exp(-1j * delay), N)
    return np.array([left, right]) + rocking()


def roll_off(x):
    """The treble ends steeply here."""
    return signal.sosfilt(signal.butter(12, 15900, fs=SR, output="sos"), x)


def record(dry):
    """A steep low-pass just under 15.9 kHz trims the top, and the loudest peaks are clipped."""
    dry = colour(dry, [(15860, 0), (15930, -60)])
    mix = np.clip(dry, -1, 1)
    return roll_off(mix)


dry = scene()
out = record(dry)
generate_wav(out)
```